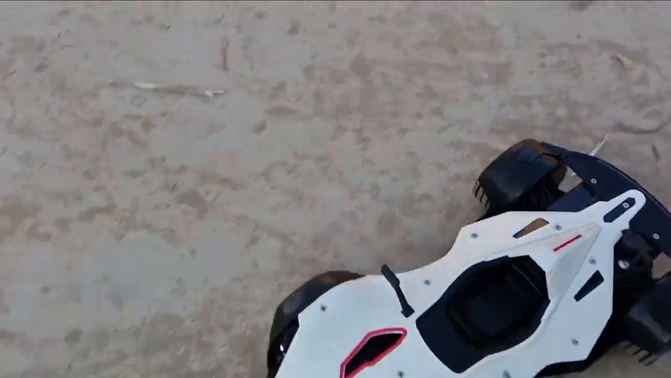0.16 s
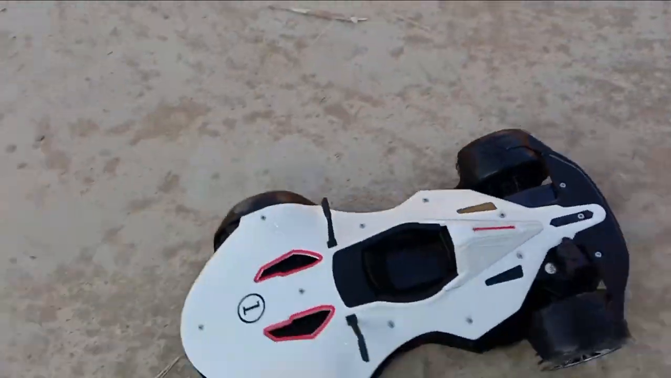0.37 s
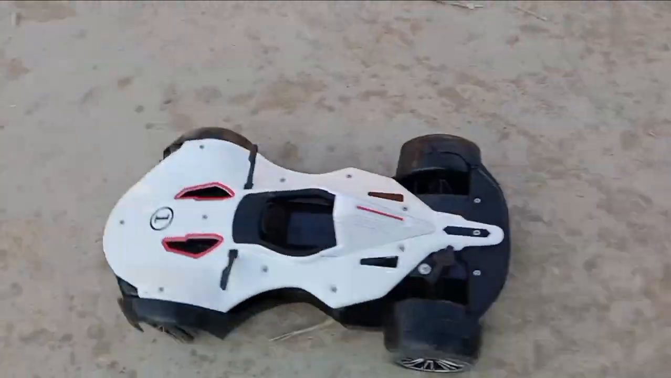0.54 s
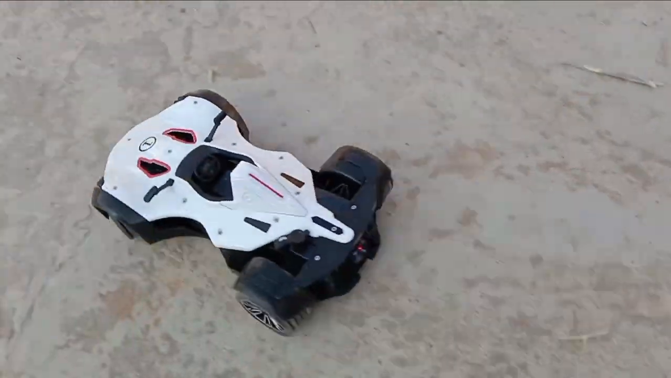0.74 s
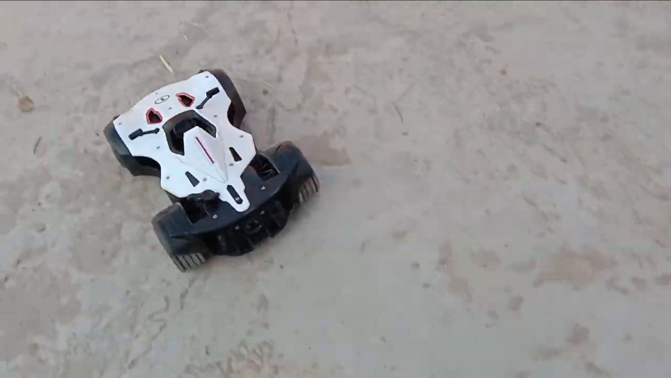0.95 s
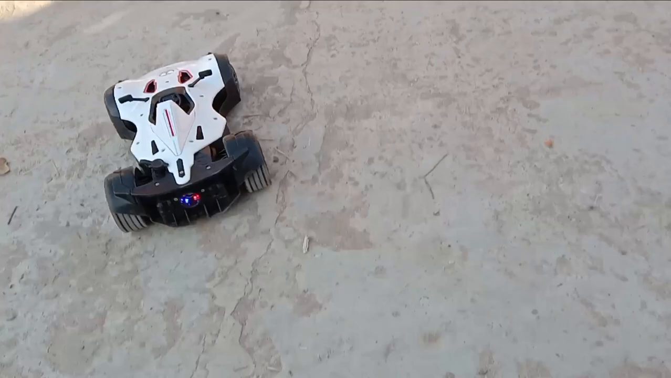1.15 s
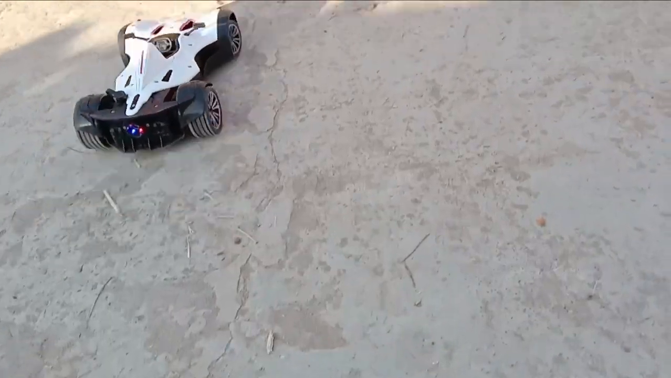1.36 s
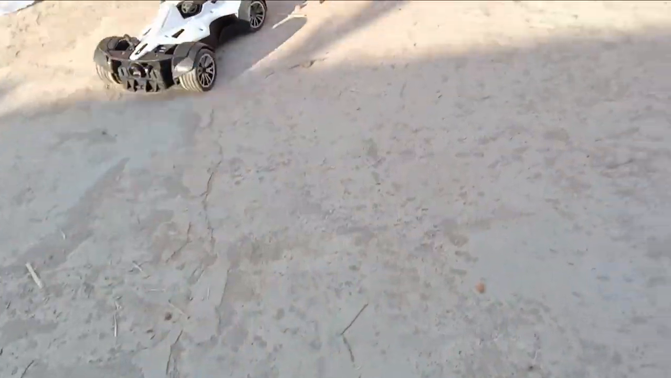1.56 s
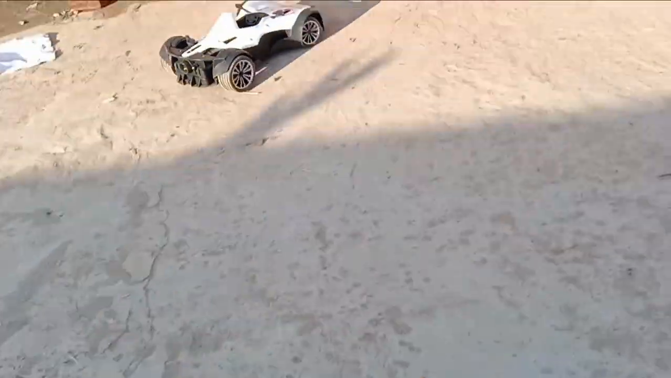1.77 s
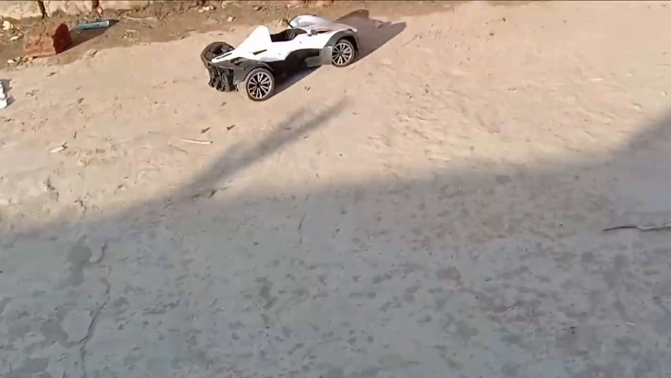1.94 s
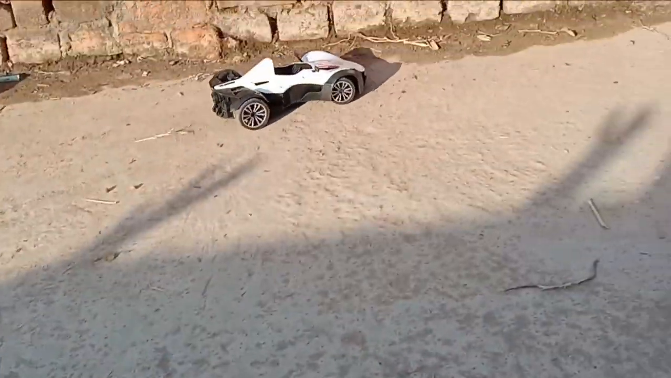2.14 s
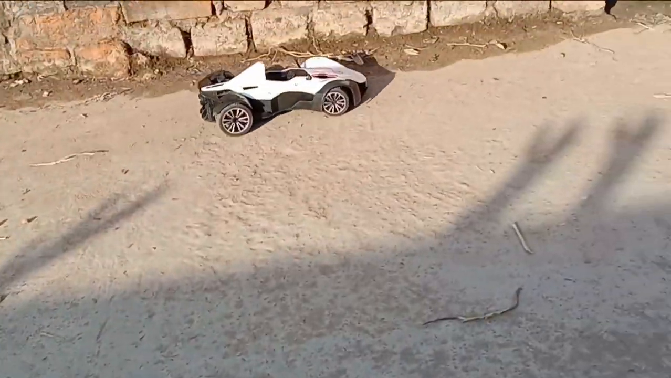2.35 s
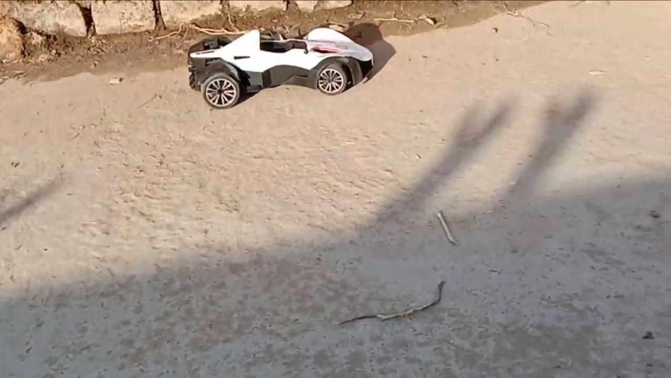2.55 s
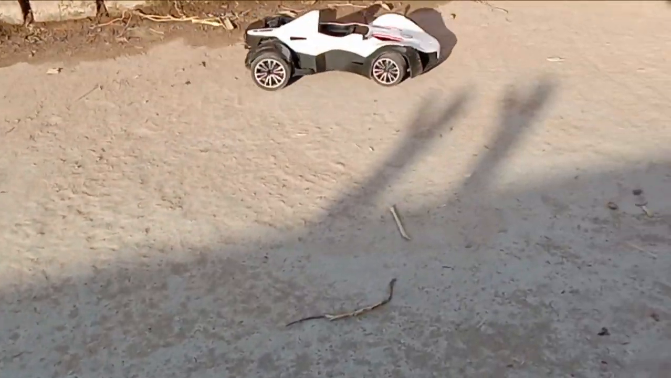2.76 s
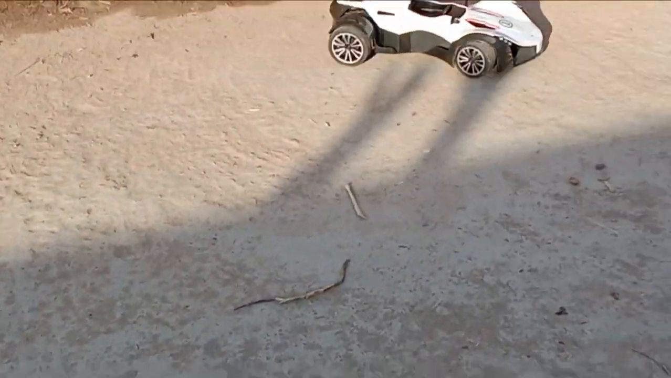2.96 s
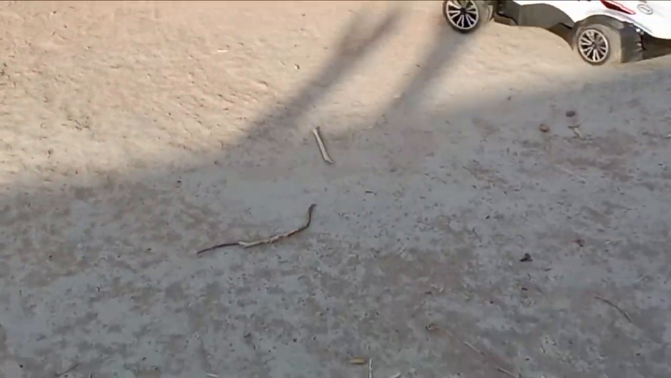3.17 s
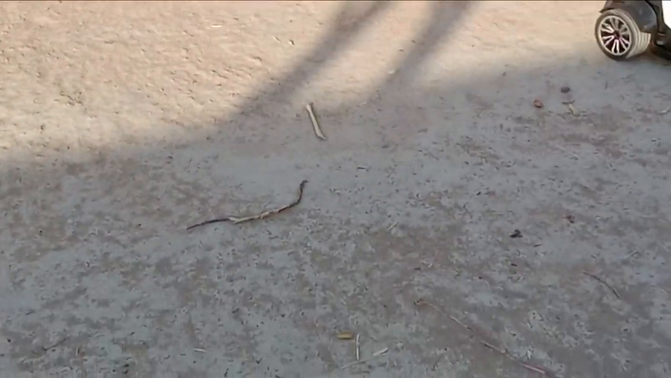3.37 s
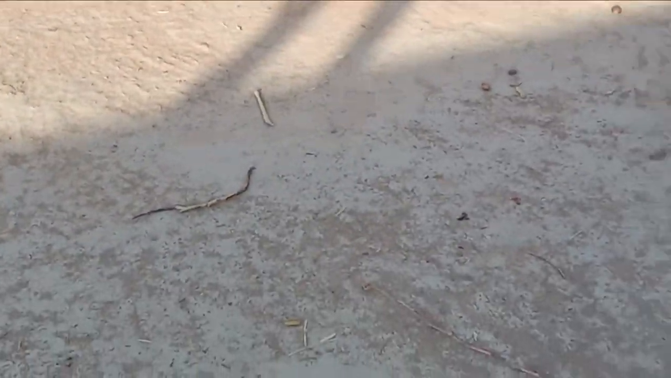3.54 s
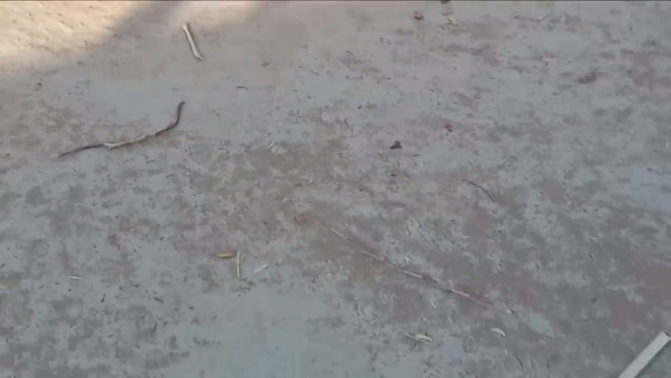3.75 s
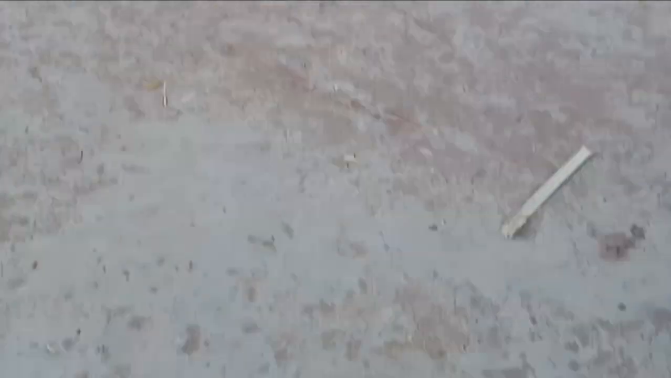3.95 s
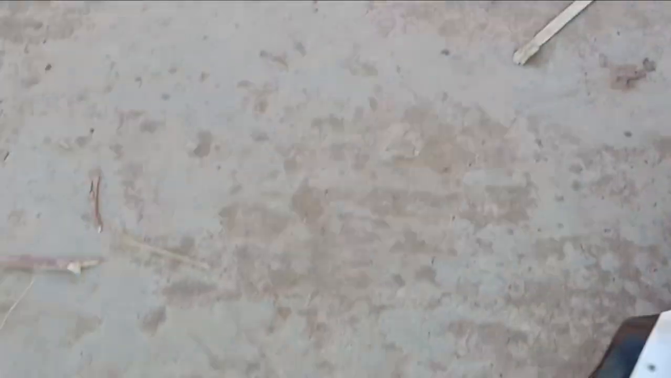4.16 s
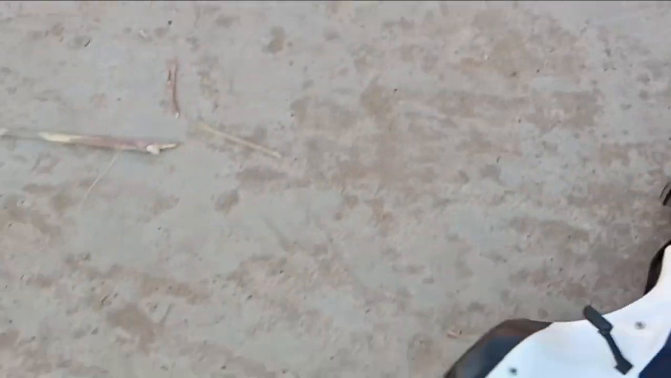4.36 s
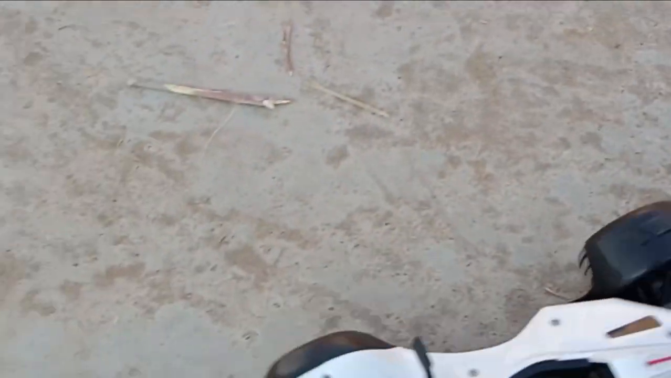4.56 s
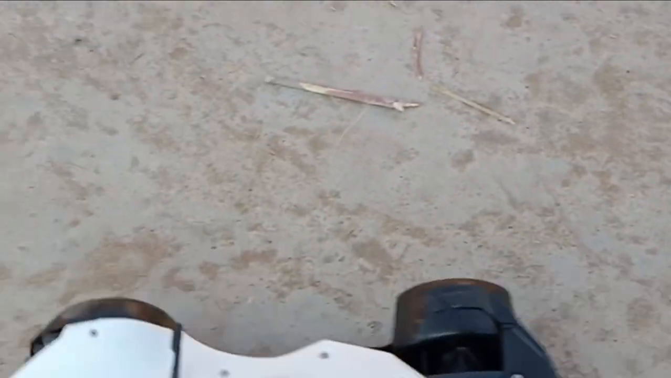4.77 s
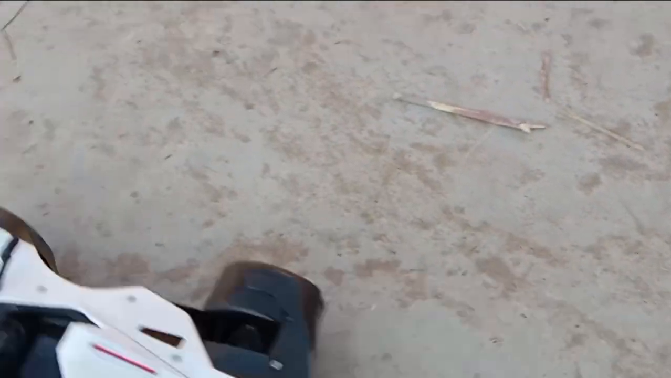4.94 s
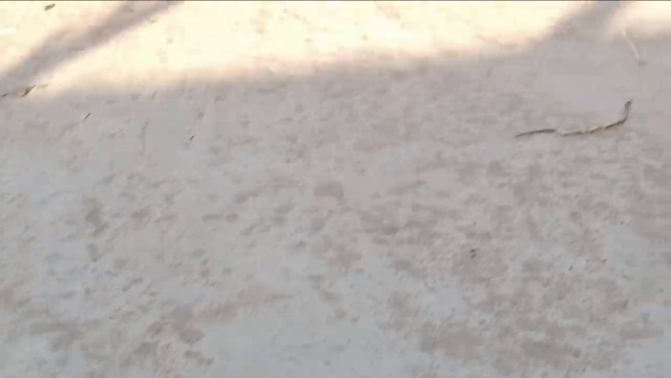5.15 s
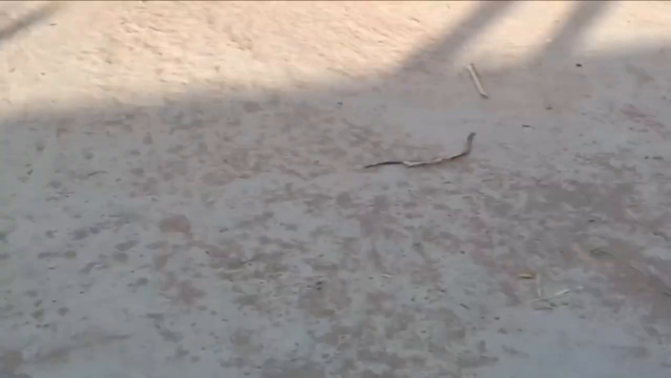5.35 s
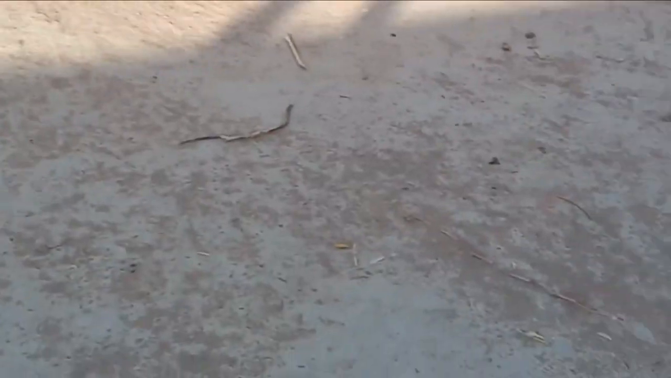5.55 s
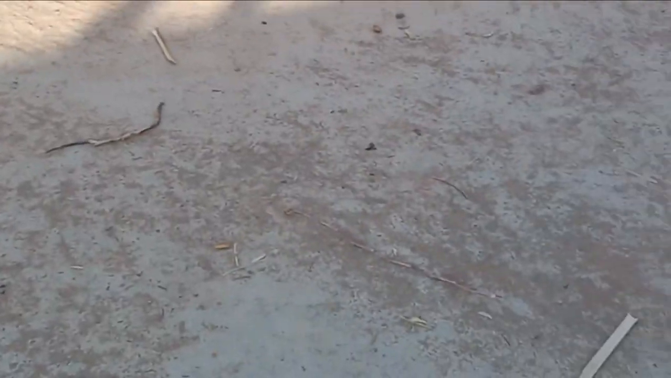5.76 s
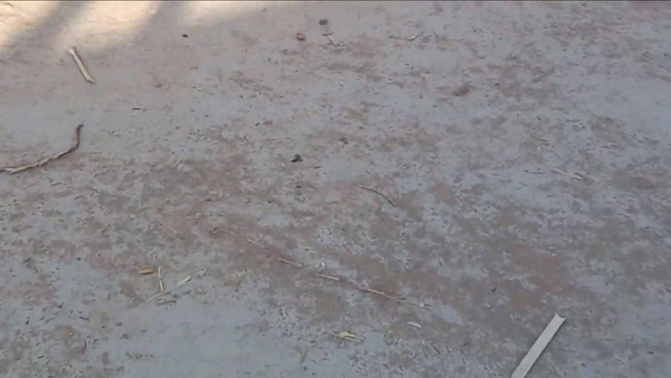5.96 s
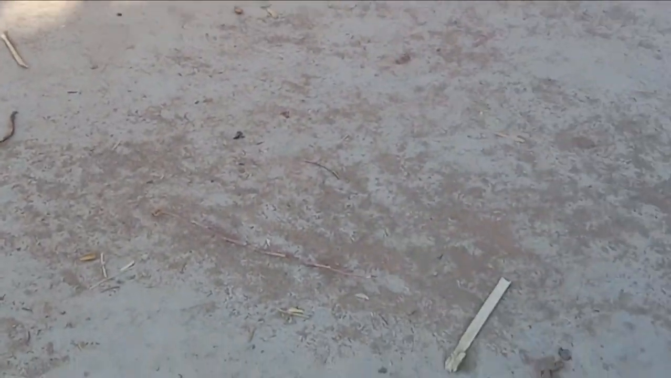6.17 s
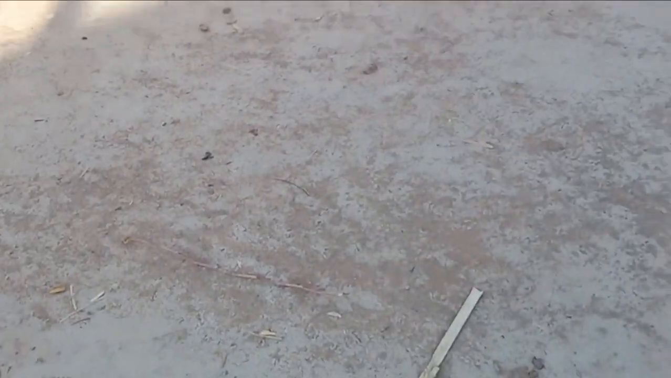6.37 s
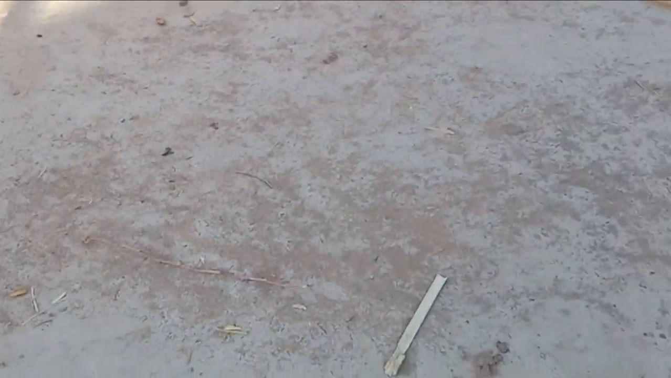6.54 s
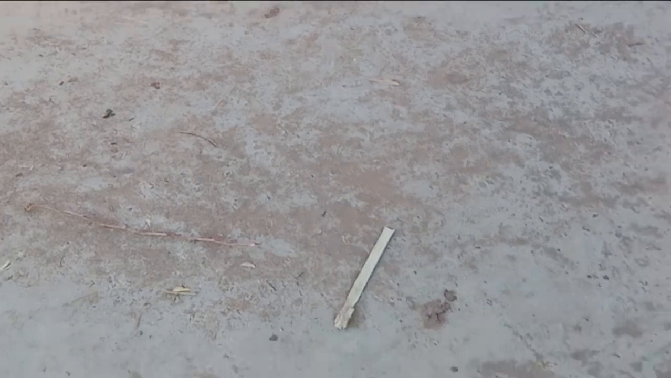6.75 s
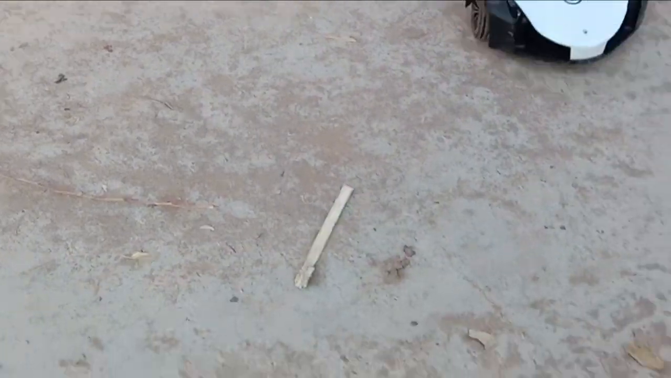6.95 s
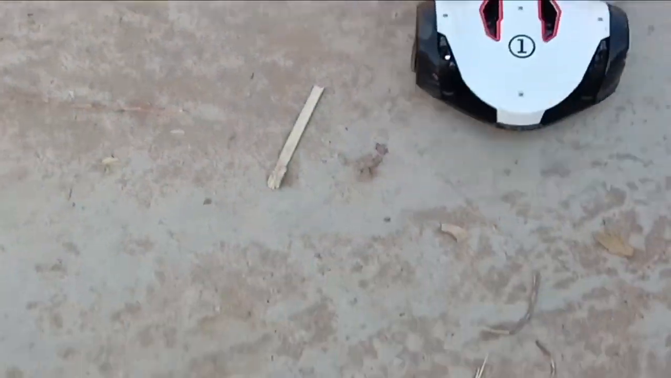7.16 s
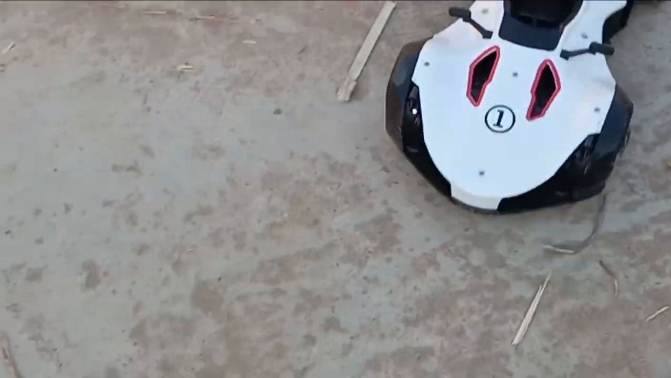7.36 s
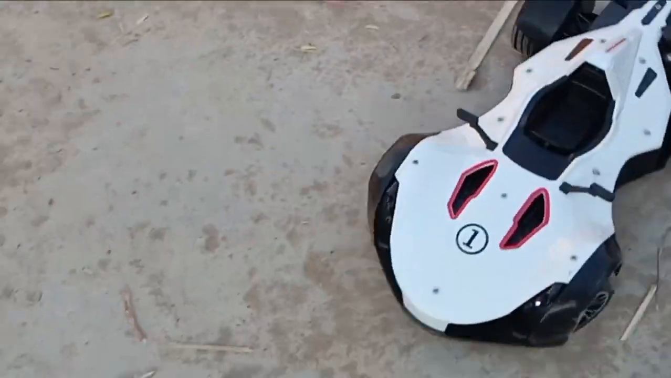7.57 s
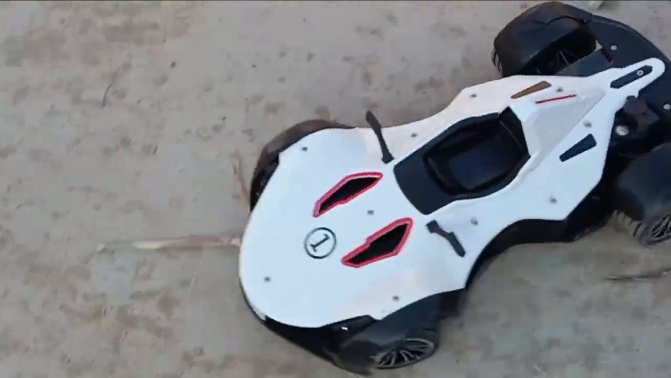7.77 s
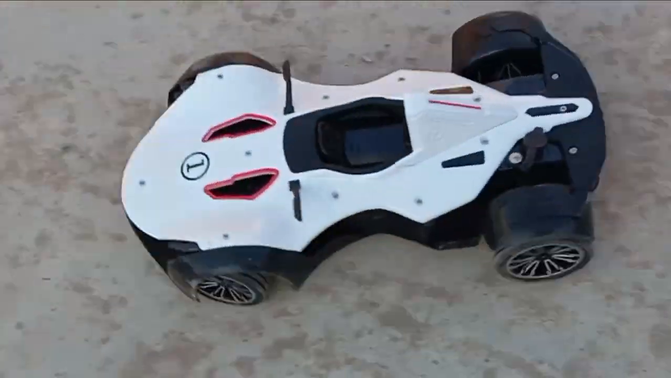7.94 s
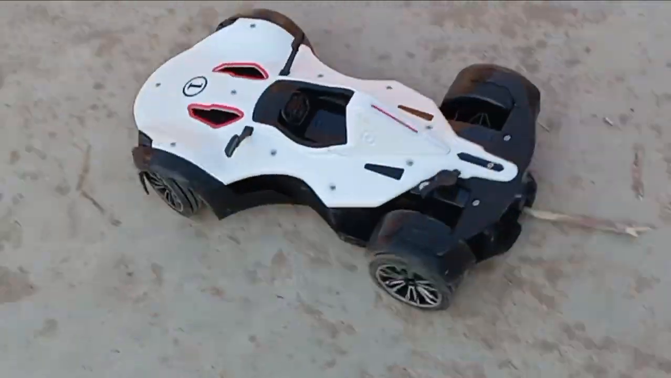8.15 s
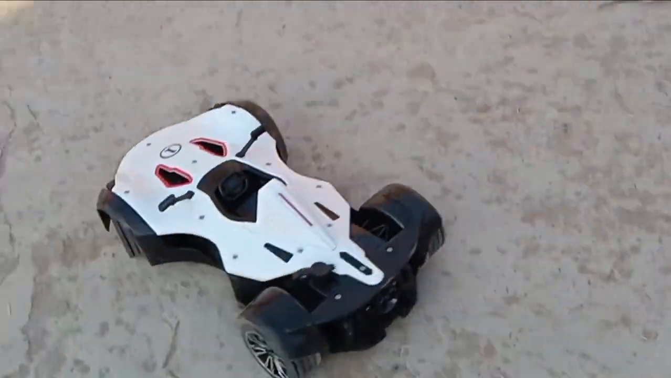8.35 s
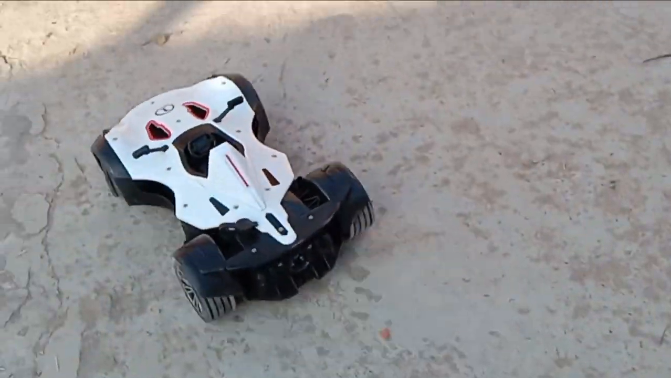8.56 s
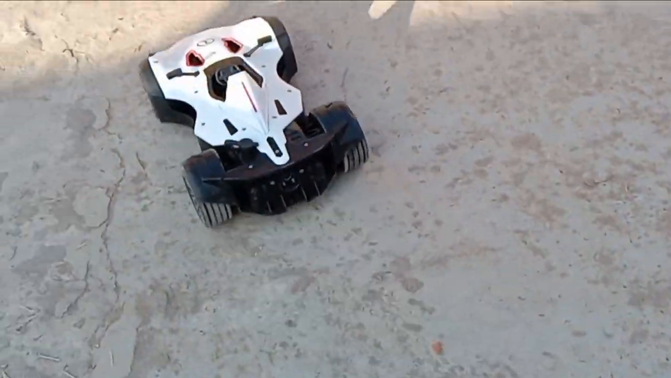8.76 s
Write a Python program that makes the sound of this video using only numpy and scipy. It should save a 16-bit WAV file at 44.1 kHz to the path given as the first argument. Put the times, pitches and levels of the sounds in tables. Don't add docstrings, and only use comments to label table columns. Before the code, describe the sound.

A small battery toy car rattles over rough concrete in three bursts, hollow plastic clattering, gears hissing, grit snapping, with brief pauses between.

```python
import sys
import numpy as np
from scipy import signal
from scipy.fft import rfft, irfft
from scipy.io import wavfile
from scipy.ndimage import uniform_filter1d

SR = 44100
rng = np.random.default_rng(int(sys.argv[2]) if len(sys.argv) > 2 else 0)


def to_wav(sig):
    pcm = np.clip(np.atleast_2d(sig), -1, 1) * 32767
    pcm = np.round(pcm).astype(np.int16)
    wavfile.write(sys.argv[1], SR, pcm.T)


def volts_from_decibels(level):
    exponent = np.asarray(level, float) / 20
    return 10 ** exponent


N = 388521
T = np.arange(N) / SR


def evened(x):
    return x / np.sqrt(np.mean(x ** 2) + 1e-20)


def add(mix, s, sound):
    part = mix[round(s * SR):][:len(sound)]
    part += sound[:len(part)]


def columns(rows, t):
    s, *values = np.transpose(rows)
    return [np.interp(t, s, v) for v in values]


def coloured(x, points):
    f, db = np.transpose(points)
    hz = np.fft.rfftfreq(len(x), 1 / SR)
    gain_db = np.interp(np.log(hz + 1), np.log(f + 1), db)
    return irfft(rfft(x) * volts_from_decibels(gain_db), len(x))


def resonate(x, hz, width):
    turn = np.exp(2j * np.pi * np.cumsum(hz * np.ones(len(x))) / SR)
    r = np.exp(-np.pi * width / SR)
    return 2 * (turn * signal.lfilter([1 - r], [1, -r], x / turn)).real


def resonate_twice(x, hz, width):
    return resonate(resonate(x, hz, width), hz, width)


def wander(low_hz, high_hz):
    step = 64
    z = rfft(rng.standard_normal(N // step + 2))
    hz = np.linspace(0, SR / step / 2, len(z))
    slow = irfft(z * (hz / low_hz) / (1 + (hz / low_hz)) / (1 + (hz / high_hz) ** 2))
    return np.interp(np.arange(N) / step, np.arange(len(slow)), evened(slow))


def swells(rows):
    return sum(db * np.exp(-((T - s) / length) ** 2) for s, length, db in rows)


def whistle(rows):
    t = np.arange(rows[0][0], rows[-1][0], 1 / SR)
    hz, db = columns(rows, t)
    tone = np.sin(2 * np.pi * np.cumsum(hz) / SR) * signal.windows.tukey(len(t), .1)
    out = np.zeros(N)
    add(out, t[0], np.sqrt(2) * volts_from_decibels(db) * tone)
    return out


# frequency in Hz, level in dB per Hz.
YARD_AIR = [(45, -5.5), (300, -23.5), (520, 3), (1200, -5.5), (1600, 0.5), (3800, -17.5), (5400, -12),
            (7000, -29), (16000, -37)]


def yard():
    level_db = -57.5 - 13.0 + 2.4 * wander(2, 15)
    return volts_from_decibels(level_db) * evened(coloured(rng.standard_normal(N), YARD_AIR))


# time in seconds, pitch in Hz, level in dB.
HUM_CURVE = [(3.55, 310, -65), (3.9, 313.5, -51.5), (4.45, 311.5, -54.5), (4.6, 311, -58)]


def hum():
    return whistle(HUM_CURVE) * volts_from_decibels(3.3 * wander(2.0, 25))


# time in seconds, pitch in Hz, level in dB.
CHIRP_CURVE = [(4.372, 8400, -63), (4.385, 7550, -42), (4.41, 6980, -35), (4.445, 6480, -35),
               (4.465, 6430, -32), (4.487, 6600, -53)]


def chirp():
    return whistle(CHIRP_CURVE)


# start in seconds, peak in dB, pitch in Hz,
# time to fall 60 dB in seconds, rise in milliseconds.
PHONE_BUMPS = [(0.6645, 14, 647, 0.006, 1.33), (0.673, 8, 212, 0.01, 3), (0.682, -23.5, 72, 0.084, 4.5),
               (.01, -58, 69.6, 0.31, 12), (.5, -37, 66.5, 0.2, 28), (.9, -42.2, 65.5, 0.27, 40),
               (1.168, -32, 117, 0.16, 17), (1.63, -22, 293, 0.024, 2.3), (1.754, -28.5, 102, 0.12, 9.9),
               (4.549, -27, 85, 0.096, 2.7), (5.032, -14.5, 352, 0.021, 2.6), (6.138, -27, 160, 0.032, 3.8),
               (6.82, -19, 610, 0.043, 2.3)]


def thumps():
    out, t = np.zeros(N), T[:9000]
    for s, db, hz, t60, rise_ms in PHONE_BUMPS:
        rise = 1 - np.exp(-(1000 * t / rise_ms) ** 2)
        add(out, s, volts_from_decibels(db - 60 * t / t60) * rise * np.sin(2 * np.pi * hz * t))
    return out


# middle in seconds, half length in
# seconds, pitch in Hz, level in dB.
SINGING_PARTS = [(5.525, 0.035, 660, -54.5), (0.14, 0.135, 1170, -35.5), (0.4, 0.12, 1160, -39),
                 (0.571, 0.055, 960, -29), (0.41, 0.19, 9700, -63), (0.979, 0.037, 3250, -48),
                 (1.19, 0.14, 925, -34.5), (1.37, 0.2, 1220, -39), (1.61, 0.095, 462, -49.5),
                 (1.91, 0.04, 1200, -59), (2.3, 0.1, 1970, -57), (2.253, 0.112, 3170, -57.5),
                 (2.385, 0.04, 3264, -46.5), (2.4, 0.12, 1500, -51), (2.43, 0.042, 2440, -51),
                 (2.471, 0.125, 760, -43.5), (2.68, 0.09, 2250, -48.5), (5.84, 0.13, 3650, -51),
                 (2.591, 0.045, 1260, -42.5), (2.76, 0.115, 1570, -49.5), (2.79, 0.08, 860, -32),
                 (2.797, 0.045, 2630, -45), (2.981, 0.092, 900, -35.5), (3.819, 0.102, 1060, -37),
                 (5.103, 0.11, 474, -48.5), (5.4, 0.115, 1015, -49), (8.405, 0.2, 320, -72),
                 (5.7, 0.105, 1050, -43.5), (5.821, 0.125, 1270, -38.5), (6.098, 0.062, 1790, -50),
                 (6.355, 0.18, 4550, -50), (6.32, 0.057, 526, -45), (6.61, 0.035, 515, -40),
                 (6.715, 0.06, 2300, -44.5), (6.955, 0.09, 990, -35), (7.14, 0.042, 850, -32.5),
                 (7.292, 0.04, 1095, -27), (7.572, 0.062, 730, -38), (6.298, .2, 3720, -46.5),
                 (8.562, 0.105, 1209, -40)]


def strands():
    out = np.zeros(N)
    for s, half, hz, db in SINGING_PARTS:
        t = np.arange(-1.2 * half, 1.2 * half, 1 / SR)
        ringing = resonate_twice(rng.standard_normal(24000), hz, 24 + 0.015 * hz)
        narrow = evened(ringing[2000:2000 + len(t)])
        add(out, max(s + t[0], 0), volts_from_decibels(db + 0.5) * np.exp(-(t / half) ** 4) * narrow)
    return out


# frequency in Hz, level in dB per Hz.
STONE_COLOUR = [(1760, -31), (3000, -31), (4590, -3.5), (5890, 7.5), (9210, -15), (12500, -2.5),
                (14600, -2), (16400, -31)]
# start in seconds, peak in dB.
GRIT_TICKS = [(0.0687, -47), (0.2104, -46), (0.2513, -38), (0.8725, -51), (1.1523, -46), (2.8709, -47.5),
              (2.9218, -37), (3.1158, -50), (3.3528, -42), (3.471, -52), (3.5346, -39), (3.6546, -44),
              (3.902, -42), (4.1495, -44), (4.7656, -37), (4.9985, -49), (5.038, -37), (5.2749, -49.5),
              (5.314, -39.5), (5.3976, -53), (5.4535, -57), (6.5779, -47), (6.6461, -44), (7.6246, -48)]


def ticks():
    out, t = np.zeros(N), T[:2600]
    for s, db in GRIT_TICKS:
        rise = 1 - np.exp(-t / 0.0005)
        add(out, s, volts_from_decibels(db + 4.5 - 60 * t / 0.013) * rise * rng.standard_normal(2600))
    return 1.56 * coloured(out, STONE_COLOUR)


# pitch in Hz, width in Hz, level in dB.
PANEL_MODES = [(2548, 580, 9), (3232, 190, 4), (3667, 440, 8), (4254, 190, 3.5)]
# pitch in Hz, width in Hz, level in dB.
HOUSING_MODES = [(4792, 106, 14), (5353, 180, 11.5), (5625, 430, 15.5), (6480, 180, 11), (6600, 290, -0.5)]
# start in seconds, peak in dB, rattle that follows in dB.
GRIT_SNAPS = [(0.9218, -40, 3), (2.481, -26, -12), (2.711, -29, 1), (2.7467, -39, 0), (2.9646, -25, 5),
              (3.048, -23, -1), (3.192, -30, 23), (3.232, -47, 6), (3.3224, -47, 16), (3.568, -44, 5),
              (3.814, -26, -5), (3.8536, -26, -18.5), (4.201, -15.5, -18), (4.578, -27, 11),
              (4.726, -28.5, -9.5), (4.8528, -45, 6.5), (4.9592, -19, 12), (5.0254, -26, 15),
              (5.228, -37, 4), (5.299, -44.5, 22), (5.5002, -45.5, 26.5), (5.668, -52, 17), (6.04, -54, 7),
              (6.322, -31.5, 18), (6.398, -33, 18), (6.5174, -24, -14), (6.679, -29, -6), (6.72, -44, 18)]


def snaps():
    clicks, rattle, t = np.zeros(N), np.zeros(N), T[:2600]
    for s, db, rattle_db in GRIT_SNAPS:
        z = rng.standard_normal(2600)
        crack = volts_from_decibels(db + 2.0 - 60 * t / 0.0049) * (1 - np.exp(-t / 0.00029)) * z
        crumble = volts_from_decibels(db - 24.0 - 60 * t / 0.048) * z[::-1]
        add(clicks, s, crack + crumble)
        add(rattle, s, volts_from_decibels(db + rattle_db - 25.5 - 60 * t / 0.093) * z)
    out = 1.56 * coloured(clicks, STONE_COLOUR)
    for hz, width, db in PANEL_MODES + HOUSING_MODES:
        out += volts_from_decibels(db - 1.5) * resonate_twice(rattle, hz, 1.9 * width)
    return out


def knock(db, hz):
    t = T[:2200]
    t60 = 0.043 if hz > 1080 else 0.061
    return volts_from_decibels(db - 60 * t / t60) * (1 - np.exp(-t / (0.028 * t60))) * np.sin(2 * np.pi * hz * t)


# start in seconds, peak in dB, ring in Hz.
LIGHT_KNOCKS = [(0.118, -14, 1117), (0.228, -11.5, 780), (0.577, -11.5, 927), (0.927, -12.5, 988),
                (1.025, -15, 910), (1.059, -13, 942), (1.121, -17, 1025), (1.529, -15, 1220),
                (3.328, -9, 957), (3.409, -13, 1003), (3.755, -12, 1340), (3.906, -11, 1230),
                (4.053, -17, 1035), (4.427, -11, 1237), (4.633, -14, 996), (4.69, -14, 1026),
                (4.958, -8.5, 963), (5.154, -16.5, 1280), (5.238, -19, 1280), (6.134, -16, 1114),
                (6.274, -22, 1140), (6.399, -14, 986), (6.441, -10.5, 1160), (6.723, -16, 1185),
                (8.212, -11, 1300), (8.249, -27, 1220), (8.311, -12.5, 1190), (8.417, -14, 1210),
                (8.448, -14, 1310)]


def taps():
    out = np.zeros(N)
    for s, db, hz in LIGHT_KNOCKS:
        add(out, s, volts_from_decibels(-5.0) * knock(db, hz))
    return out


# start in seconds, peak in dB, ring in Hz, bright part in dB.
HARD_KNOCKS = [(0.542, -13, 1030, -25), (1.099, -14.5, 1000, -44), (1.158, -19, 952, -11),
               (1.194, -13.5, 926, -9), (3.072, -17, 1060, -28), (3.115, -17, 943, -12),
               (3.162, -12.5, 1030, -29), (3.271, -14.5, 973, -16), (3.45, -12.5, 956, -15),
               (3.529, -19.5, 856, 10), (3.657, -16.5, 1036, -14), (3.841, -13, 994, -23),
               (4.129, -18, 1016, -34), (4.2, -14.5, 1050, -12), (4.719, -14, 930, -8),
               (4.776, -10.5, 1260, -2), (4.863, -13.5, 657, -24), (4.934, -15.5, 1210, 2),
               (5.931, -18, 1030, -25), (6.206, -23.5, 922, -20), (6.575, -9, 1061, -15),
               (6.788, -17, 1180, 0), (6.822, -13, 1130, -19), (7.207, -22, 1050, -21),
               (7.42, -16.5, 1065, -25), (7.635, -10.5, 1120, -12), (8.108, -17.5, 1184, -14),
               (8.275, -14, 1270, -4), (8.567, -17.5, 1354, -39)]


def knocks():
    out, bright, t = np.zeros(N), np.zeros(N), T[:2200]
    for s, db, hz, bright_db in HARD_KNOCKS:
        add(out, s, volts_from_decibels(2.0) * knock(db, hz))
        add(bright, s, volts_from_decibels(db + bright_db - 26 - 60 * t / 0.025) * rng.standard_normal(2200))
    for hz, width, db in [(2000, 410, -25.0)] + PANEL_MODES + HOUSING_MODES:
        out += volts_from_decibels(db - 1.0) * resonate(bright, hz, width)
    return out


# landing in seconds, time in the air in seconds, loss in dB.
WHEEL_HOPS = [(.661, 0.045, 6), (1.021, 0.09, 4.5), (1.056, 0.015, 6), (1.095, 0.017, 7), (1.155, 0.028, 4),
              (1.191, 0.029, 3.5), (1.372, 0.026, 9), (1.626, 0.021, 10), (1.686, .015, 9),
              (1.749, 0.031, 10), (3.114, 0.016, 3.5), (3.528, 0.0087, 0.5), (3.656, 0.034, 3),
              (4.718, 0.011, 0.5), (5.93, 0.011, 1.5), (7.418, .015, 3), (8.447, 0.012, 0),
              (4.127, 0.063, 8), (4.771, 0.02, 3), (4.932, 0.018, 2.5), (5.235, 0.053, 4),
              (5.301, 0.034, 18), (5.499, 0.085, 6), (5.606, 0.049, 12), (6.133, 0.044, 5),
              (6.206, 0.042, 2.5), (6.362, 0.019, 6), (6.786, 0.091, 2), (7.207, 0.12, 2.5),
              (8.717, 0.051, 3)]


def hops():
    lost = sum(db * np.clip(1 + (T - s) / air, 0, 1) ** 0.08 * (T < s) for s, air, db in WHEEL_HOPS)
    return -uniform_filter1d(lost, size=120)


# middle in seconds, length in seconds, rise in dB.
FREE_SPINS = [(1.27, 0.046, 8.5), (2.85, 0.9, 4), (4.85, 0.23, 8), (5.9, 1, 7), (6.95, 0.26, 14.5),
              (8.05, 0.35, 12.5)]


def spins():
    return swells(FREE_SPINS)


# middle in seconds, length in seconds, rise in dB.
SIDE_SKIDS = [(1.27, 0.06, 7), (2.2, 0.043, 18.5), (5.31, 0.15, 23), (5.51, 0.033, 23.5), (6.33, 0.018, 17),
              (3.53, 0.02, 7.5), (3.85, 0.21, 14), (4.97, 0.0068, 7), (7.65, 0.054, 15.5),
              (7.98, 0.13, 15.5), (6.72, 0.2, 9.5), (8.33, 0.16, 22), (8.49, 0.071, 25),
              (8.59, 0.046, 34.5)]


def skids():
    return swells(SIDE_SKIDS)


# start in seconds, peak in dB.
GEAR_CATCHES = [(0.209, -24), (0.2665, -26), (0.8709, -26), (0.9527, -24), (1.3753, -39), (1.564, -19),
                (1.629, -23), (2.4803, -25), (2.7501, -24), (2.8794, -20), (2.9645, -14), (3.1133, -22.5),
                (3.193, -16), (3.232, -11), (3.2665, -12), (3.3199, -23), (3.4401, -20), (3.534, -15.5),
                (3.5673, -23.5), (4.1415, -26.5), (4.203, -14), (4.345, -26), (4.6249, -30), (4.777, -11.5),
                (4.818, -23.5), (4.8988, -19.5), (4.9554, -3), (5.023, -13), (6.04, -24), (6.2088, -19),
                (6.513, -17), (6.548, -32), (6.609, -15), (6.7211, -28.5), (6.8196, -28.5), (7.3444, -23),
                (7.452, -19), (7.6345, -22)]


def catches(gear_db):
    lift_db, t = np.zeros(N), T[:3000]
    for s, db in GEAR_CATCHES:
        lift = np.clip(db - gear_db[round(s * SR)] - 6.5, 0, 10)
        add(lift_db, s, lift * np.exp(-(t / 0.015) ** 1.9))
    return uniform_filter1d(lift_db, size=220)


def jolts(per_s, fade_s):
    turns = np.cumsum(per_s * volts_from_decibels(3.5 * wander(1.4, 25))) / SR
    catch = np.diff(np.floor(turns), prepend=0) * rng.exponential(1, N)
    swell = np.log(signal.lfilter([1], [1, -np.exp(-1 / (fade_s * SR))], catch) + 0.22)
    return evened(uniform_filter1d(swell - swell.mean(), size=200))


def grit(per_s, spread_db, smooth):
    hit = rng.random(N) < per_s / SR
    size = rng.exponential(1, N)
    rub = rng.standard_normal(N)
    contacts = hit * np.sign(rub) * volts_from_decibels(spread_db * np.minimum(size, 4))
    return evened(contacts) + smooth * rub


def ring(drive, modes, level_db, bumps_db, turning_db):
    out = 0
    for hz, width, db in modes:
        drift_hz = 14 + .016 * np.clip(hz - 1300, 0, 2500)
        bent_hz = hz + drift_hz * wander(.6, 3)
        mode = resonate(resonate(drive, bent_hz, 0.95 * width), bent_hz, 1.22 * width)
        out = out + volts_from_decibels(db + turning_db * wander(0.56, 4.4)) * evened(mode)
    out = out * volts_from_decibels(bumps_db)
    slow_power = uniform_filter1d(uniform_filter1d(out ** 2, SR // 9), SR // 9)
    return volts_from_decibels(level_db) * out / np.sqrt(slow_power + 1e-9)


# frequency in Hz, level in dB per Hz.
GROUND_COLOUR = [(20, -57), (45, -39.5), (70, -9.5), (140, -5.5), (230, -5.5), (380, -2.5), (520, -36),
                 (880, -95.5)]


def ground(rumble_db, bumpy):
    rumble = evened(coloured(rng.standard_normal(N), GROUND_COLOUR))
    return rumble * volts_from_decibels(0.35 * rumble_db + 1.8 * bumpy - 54 + 3 * wander(3, 13))


# pitch in Hz, width in Hz, level in dB.
CHASSIS_MODES = [(486.4, 101, -11.5), (618.6, 57, -3.5), (834, 63, 1.5)]


def underside(coarse, roll_db, weight_db, strain_db, skid_db, turn, road):
    modes = CHASSIS_MODES + [(770 * (1 + 0.077 * turn), 90, 0)]
    plate_db = roll_db + weight_db - 0.6 + 0.052 * skid_db
    out = ring(coarse, modes, plate_db, 2.0 * road + 1.1 * wander(12, 88), 4.56)
    low_db = roll_db + 0.5 * weight_db + 0.19 * strain_db - 13.0
    return out + ring(coarse, [(520.6, 44.5, 0)], low_db, 4.8 * wander(2.2, 30), 0)


# pitch in Hz, width in Hz, level in dB.
HUB_MODES = [(949, 37, 0), (1001.7, 64, 5)]


def hub_and_shell(coarse, roll_db, skid_db, lean_db, shell_hz, road, load):
    hub_db, shell_db = [roll_db - 10 * np.log10(1 + volts_from_decibels(side * lean_db) ** 2) for side in (-1, 1)]
    shell = [(shell_hz * .92, 70, -4), (shell_hz, 90, 0), (shell_hz * 1.1, 90, -4)]
    hub_bumps_db = 0.35 * road + 1.1 * load + 2.3 * wander(7.9, 55)
    out = ring(coarse, HUB_MODES, hub_db + .1, hub_bumps_db, 0.93)
    return out + ring(coarse, shell, shell_db + 0.076 + 0.17 * skid_db, 1.74 * road + 0.34 * load, 2.17)


def axles(fine, roll_db, weight_db, strain_db, spin_db, skid_db, turn, road, load):
    modes = [(1900 * (1 + 0.27 * turn), 420, -2), (1620, 170, -3), (1870, 150, -3), (2220, 380, -4)]
    level_db = roll_db + 0.78 * weight_db + 0.8 * strain_db + skid_db - 2.5 - .2 * spin_db
    return ring(fine, modes, level_db, 1.3 * road + 1.9 * load, 1.8)


# pitch in Hz, width in Hz, level in dB.
TEETH_MODES = [(7550, 340, 13.5), (8400, 330, 3.5), (9850, 1100, 8), (10520, 780, 5), (12060, 2000, 7.5),
               (12800, 3100, -1), (14500, 1600, -12.5)]


def gears(fine, gear_db, weight_db, strain_db, spin_db, skid_db, turn, bumpy, road, load):
    panels = PANEL_MODES + [(3250 * (1 + 0.27 * turn), 160, 2.5)]
    panel_db = gear_db - 2.5 + 0.15 * skid_db - .1 * spin_db
    out = ring(fine, panels, panel_db, 1.0 * road + 2.9 * load, 1.8)
    housing_hz = 5500 * (1 + 0.036 * turn) + 45 * spin_db
    housing = HOUSING_MODES + [(housing_hz, 600, 11.5 + .7 * spin_db)]
    housing_db = gear_db - 0.1 * strain_db - 0.17 * weight_db - 10.0 + .3 * spin_db
    out += ring(fine, housing, housing_db, 0.76 * road + 3.64 * load, 1.5)
    teeth_db = 0.58 * gear_db - 45.5 + 0.6 * turn + 1.1 * spin_db
    teeth_bumps_db = 0.54 * road + 2.0 * load + 1.9 * bumpy * wander(6, 40)
    return out + ring(fine, TEETH_MODES, teeth_db, teeth_bumps_db, 3.3)


# time in seconds, rolling level in dB,
# weight on the underside in dB, gear strain in dB.
DRIVES = [
    [(0.0, -29.5, -11.5, -13), (0.25, -32, -1, -4.5), (0.55, -29.5, -7, -1.5), (0.7, -32.5, -4.5, -9),
     (1.1, -34, -17, -4.5), (1.25, -27.5, -5.5, -4.5), (1.58, -33, -6.5, -4.5), (1.72, -52, -12, 1.5),
     (2.13, -63.5, -14, -7.5)],
    [(2.3, -38, -6, -12), (2.65, -49.5, 1.5, 7.5), (2.8, -28, -2.5, -3), (3.45, -24.5, -2, -3.5),
     (3.65, -30, -1, -7.5), (4.05, -24, -5.5, -18), (4.2, -23, -5, -11), (5.03, -28.5, 1, -1),
     (5.12, -40, -18.5, -11)],
    [(5.5, -47.5, -13, -17.5), (5.9, -31, -19, -6.5), (6.2, -27.5, -17.5, -16), (7.0, -26.5, -15, -6.5),
     (7.24, -25, -9, -17), (7.55, -27, -1.5, -7.5), (8.0, -29, -17.5, -5), (8.56, -36.5, -33.5, -9),
     (8.69, -55.5, -19, -23)],
]
# time in seconds, hub over shell in dB,
# turn (about -1 to 1), shell pitch in Hz, bumpiness (0 is smooth).
FACING = [(0.0, -12, 0.23, 1080, 0.21), (.3, -4.5, -0.16, 1130, 1.1), (.55, -2, -0.64, 1218, 3.4),
          (.72, -2.5, -1.1, 1265, 2.3), (1.12, 1, 0.74, 1191, 2.6), (1.45, 0, -0.61, 1281, 3.3),
          (2.55, -6.5, 0.38, 1203, 0.66), (2.85, 4.5, 0.73, 1154, 2), (3.43, 8.5, 0.77, 1142, 2.4),
          (3.83, -2.5, 0.15, 1268, 2.3), (4.2, 8.5, 0.34, 1290, 0.44), (5.05, -7, -0.2, 1224, 3.75),
          (5.5, -6, 0.63, 1256, 0.94), (6.6, 3, .7, 1099, 2.4), (6.8, -6.5, 0.25, 1149, 0.7),
          (7.24, 2, 0.5, 1139, 0.56), (7.9, -9, -0.62, 1186, 0.51), (8.6, -7.5, -0.25, 1309, 2.05)]


def car():
    roll_db, weight_db, strain_db = columns(np.concatenate(DRIVES), T)
    lean_db, turn, shell_hz, bumpy = columns(FACING, T)
    roll_db = roll_db + hops()
    spin_db, skid_db = spins(), skids()
    gear_db = roll_db + strain_db
    road = 0.62 * bumpy * wander(1.3, 45)
    load = 0.35 * bumpy * volts_from_decibels(-.3 * spin_db) * jolts(30, 0.012) + 0.37 * catches(gear_db)
    coarse, fine = grit(1500, 1.0, 0.69), grit(2000, 2.44, 0.15)
    out = ground(roll_db + weight_db, bumpy)
    out += underside(coarse, roll_db, weight_db, strain_db, skid_db, turn, road)
    out += hub_and_shell(coarse, roll_db, skid_db, lean_db, shell_hz, road, load)
    out += axles(fine, roll_db, weight_db, strain_db, spin_db, skid_db, turn, road, load)
    return out + gears(fine, gear_db, weight_db, strain_db, spin_db, skid_db, turn, bumpy, road, load)


# middle in seconds,
# half length in seconds, frequency in Hz, change in dB.
GROUND_ECHOES = [(.06, 0.18, 4300, 4), (.19, 0.49, 6450, -10), (.256, 0.074, 5100, 11),
                 (.35, 0.26, 2920, 13), (.52, 0.35, 7440, -13), (0.647, 0.32, 5080, 8),
                 (1.026, 0.2, 7600, -7), (1.13, 0.17, 4830, 9.5), (1.525, 0.26, 4140, -10),
                 (1.902, 0.32, 3880, -22.5), (2.68, 0.17, 560, -11), (3.23, 0.23, 1435, -9),
                 (3.413, 0.25, 2740, -11), (3.845, 0.088, 1690, 4.5), (3.94, 0.29, 2820, -13),
                 (4.212, 0.12, 645, -24), (4.354, 0.17, 5200, -11), (6.42, 0.16, 1500, -13),
                 (6.423, 0.2, 806, 13), (6.93, .07, 2400, -27), (7.31, 0.34, 1990, -17),
                 (7.32, 0.43, 8400, -10), (7.404, 0.13, 5030, -11), (7.52, 0.063, 3720, 7),
                 (7.943, 0.28, 7700, 8), (8.21, 0.18, 2110, -20), (8.364, 0.31, 4670, -11),
                 (8.366, 0.11, 7500, 14.5), (8.38, 0.29, 3030, -17), (8.4, 0.31, 1720, 8)]


def mirrored(x):
    hz, t, z = signal.stft(x, SR, nperseg=512, noverlap=384)
    field = rng.standard_normal((len(t), len(hz))).T
    for _ in range(2):
        field = uniform_filter1d(uniform_filter1d(field, size=3, axis=0), size=24, axis=1)
    notch_db = np.clip(10.8 * (evened(field) + 0.58), -14, 0) + 0.65
    notch_db = notch_db * np.clip(hz[:, None] / 2200, 0, 1) ** 0.26
    echo_db = 0
    for s, half, at_hz, db in GROUND_ECHOES:
        region = np.exp(-(np.log((hz + 1) / at_hz) / 0.097) ** 2)
        moment = np.exp(-((t - s) / half) ** 4)
        echo_db = echo_db + db * np.outer(region, moment)
    return signal.istft(z * volts_from_decibels(0.88 * echo_db + notch_db), SR, nperseg=512, noverlap=384)[1][:N]


def scene():
    near = chirp() + ticks() + snaps() + taps() + knocks() + mirrored(car())
    tail = rng.standard_normal(6000) * volts_from_decibels(-60 * T[:6000] / 1.3) * (T[:6000] > .006)
    wall = signal.oaconvolve(near, tail / np.linalg.norm(tail))[:N]
    return (yard() + hum() + thumps() + strands() + volts_from_decibels(-26.5) * wall + near)[None]


def low_pass(x):
    return signal.sosfilt(signal.butter(12, 16530, fs=SR, output="sos"), x)


def record(dry):
    low_cut = signal.sosfilt(signal.butter(2, 48, "high", fs=SR, output="sos"), dry[0])
    hz, _, z = signal.stft(low_cut, SR, nperseg=512, noverlap=384)
    power = uniform_filter1d(uniform_filter1d(abs(z) ** 2, size=3, axis=0), size=5, axis=1)
    power_db = 10 * np.log10(power + 1e-20)
    under_db = np.clip(-82.5 - power_db, 0, 12) * (hz[:, None] > 6500)
    edge_db = -30 * (hz[:, None] > 15600) * (power_db < -78)
    clean = signal.istft(z * volts_from_decibels(edge_db - 1.1 * under_db), SR, nperseg=512, noverlap=384)[1][:N]
    return low_pass(clean[None])


dry = scene()
out = record(dry)
to_wav(out)
```